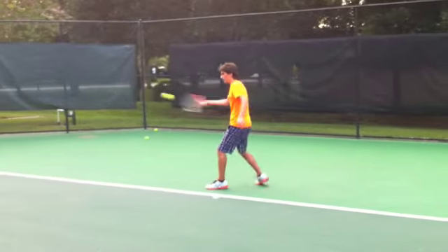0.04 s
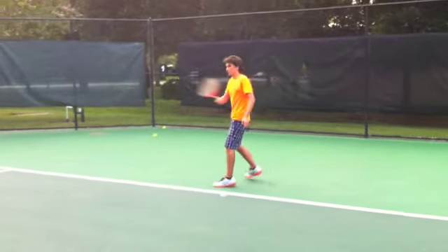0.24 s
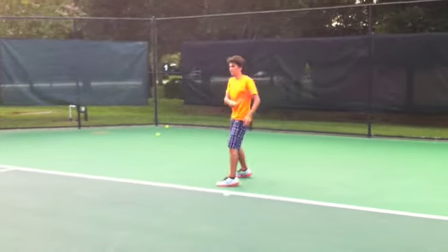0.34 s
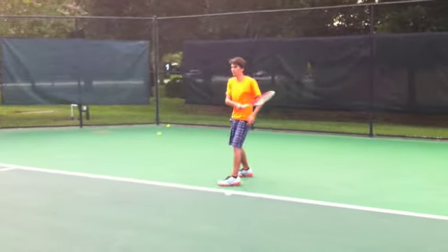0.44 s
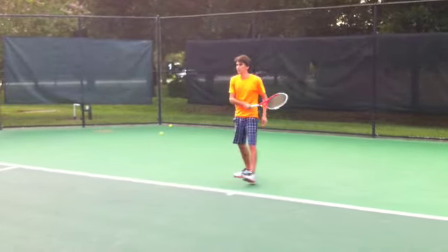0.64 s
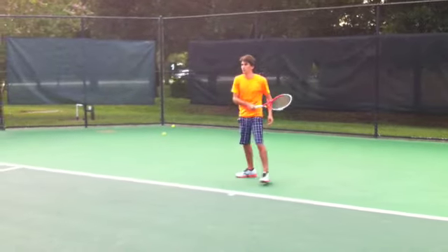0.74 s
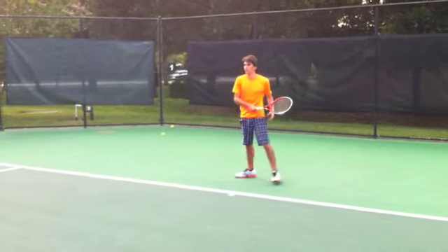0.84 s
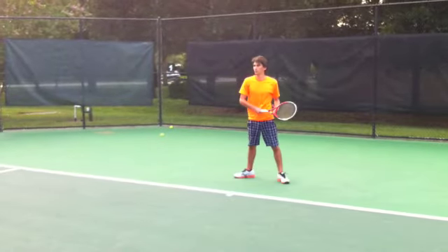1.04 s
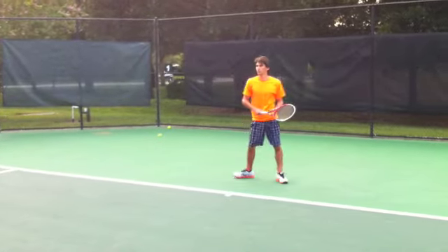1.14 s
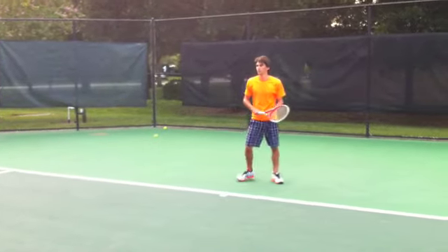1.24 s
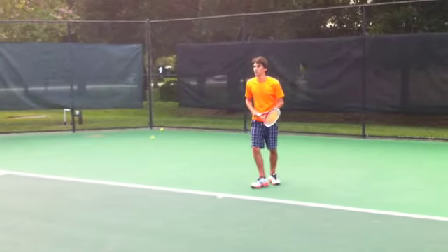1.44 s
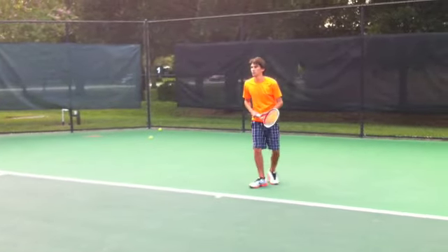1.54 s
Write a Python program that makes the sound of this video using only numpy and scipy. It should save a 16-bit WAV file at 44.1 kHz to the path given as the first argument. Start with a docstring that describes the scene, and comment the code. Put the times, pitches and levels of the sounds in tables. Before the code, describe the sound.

One crisp tennis stroke, strings ringing briefly, then light shoe scuffs over soft outdoor background noise

```python
"""One tennis stroke on an outdoor hard court: the strings crack against the ball, the ball pops, the strings ring on.
Shaped noise makes the crack and fading sine waves make the rest; the fence and trees send back smeared echoes.
Shoes scuff and tap with short bursts of noise, plus a low fading tone under each tap.
Behind lie coloured noise for distant traffic and leaves, a wavering engine hum, faint insects made of
narrow noise, and one thin falling whistle, probably a bird, made of a gliding sine."""
import sys
import numpy as np
from scipy import signal
from scipy.fft import rfft, irfft
from scipy.io import wavfile
from scipy.ndimage import uniform_filter1d

SR = 44100
rng = np.random.default_rng(int(sys.argv[2]) if len(sys.argv) > 2 else 0)


def generate_wav(signal):
    """Clip the signal to [-1, 1] and save it as 16-bit WAV at the path in sys.argv[1]."""
    frames = np.transpose(np.atleast_2d(signal))
    scaled = np.clip(frames, -1, 1) * 32767
    pcm = np.round(scaled).astype(np.int16)
    wavfile.write(sys.argv[1], SR, pcm)


N = 70560
T = np.arange(N) / SR  # time of each sample, s

# In the tables, fall60/s is the time to fade by 60 dB. A "colour" gives the balance of a noise over pitch.
# Colour of outdoor air, traffic and leaves: f/Hz, relative level/dB
AIR_COLOUR = [(25, -7), (45, -15), (80, -6.5), (125, -1), (180, 0.5), (255, -2), (320, -9.5), (430, -11.5),
              (620, -9.5), (1000, -9), (1400, -11.5), (1850, -12.5), (2200, -18.5), (3000, -22.5),
              (4300, -25), (5100, -22.5), (6200, -29.5), (9500, -29.5), (11000, -32.5), (16000, -33.5)]
# Loudness of the engine hum over time: t/s, level/dB
HUM_LEVEL = [(0, -64), (.6, -60.5), (.95, -62), (1.2, -58), (1.6, -60)]
# Path of the whistle: t/s, f/Hz, level/dB
WHISTLE_PATH = [(.7, 3750, -84), (.735, 3730, -66), (.77, 3715, -73), (.81, 3690, -66), (.87, 3620, -68),
                (.92, 3580, -72), (1.0, 3540, -84)]
# Shoe scuffs: start t/s, level/dB, rise/s, hold/s, fall60/s, tilt/(dB per octave), relative rasp level/dB
SCUFFS = [(.005, -58, 0.013, 0.013, 0.15, -1.5, -19), (0.445, -55, 0.013, 0.025, 0.25, 3, -3),
          (0.493, -60.5, .008, 0.012, 0.76, 2.5, 4), (0.566, -55.5, 0.012, 0.0059, 0.27, -4.5, -4),
          (1.555, -50, 0.02, 0.0098, 0.098, 3.5, 7)]
# Colour of a sole rubbing on the court, before the tilt: f/Hz, relative level/dB
SOLE_COLOUR = [(60, -42), (200, -1), (800, -0.5), (1600, 3), (2600, 1), (3900, 1), (5000, -1.5),
               (9000, -10.5), (16000, -18)]
# Shoe taps: start t/s, click level/dB, thud level/dB
TAPS = [(1.0839, -43, -41.5), (1.141, -51.5, -69)]
# Colour of the tap's click: f/Hz, relative level/dB
TAP_COLOUR = [(200, -4), (600, 0), (1000, 12.5), (1400, 2), (2100, -2), (3500, -13), (6500, -11),
              (9500, -11.5), (16000, -24)]
# Echoes off the fences and trees: delay/s, level/dB, smear fall60/s, tilt/(dB per octave)
ECHOES = [(0.03, -23.5, .035, 1), (0.041, -23.5, .05, 1), (.061, -28, 0.062, 1), (0.089, -32, 0.11, 1),
          (0.134, -32.5, .04, -5.5), (.185, -31, 0.02, -6.5)]
# Colour shared by the echoes, before the tilt: f/Hz, relative level/dB
ECHO_COLOUR = [(200, -1.5), (600, -12), (1000, -3.5), (1600, 0.5), (3000, 2.5), (6000, 4.5), (14000, 7)]
# How long the thin tail lasts at each pitch: f/Hz, fall60/s
TAIL_FADE = [(200, 2.1), (1000, 2.7), (3000, 0.79), (12000, 1.03)]
# Ringing tones of the string bed, lowest first: f/Hz, level/dB, fall60/s
STRING_MODES = [(613, -42.5, 0.28), (1568, -33.5, .12), (1715, -34.5, 0.056), (1905, -36, .07),
                (2150, -45.5, 0.16), (2260, -41.5, 0.086), (2635, -44, 0.091), (2810, -45, 0.081),
                (2900, -43.5, 0.065), (3900, -61, 0.06), (4200, -60, .05)]
# Colour of the crack and the rattle: f/Hz, relative level/dB
CRACK_COLOUR = [(150, -24), (500, -7), (1000, -9), (1600, 1.5), (2300, -6), (3300, -4), (5000, -12),
                (6800, -16.5), (8800, -12.5), (10300, -23.5), (16000, -23)]
# Push of the ball on the string bed: f/Hz, level/dB, rise/s, hold/s, fall60/s
THUMP_MODES = [(219.7, -30.5, 0.0047, 0.0043, 0.0084), (654, -25, 0.0035, 0.0016, 0.0053)]
# Hollow pop of the ball as it leaves: f/Hz, level/dB, rise/s, hold/s, fall60/s
POP_MODES = [(944, -31.5, 0.00033, 0.00047, 0.04), (999, -20, 0.00037, 0.0036, 0.02),
             (1203, -30, 0.00036, 0.009, 0.0067)]

HIT_S, DWELL_S = .2058, 0.00378  # first contact; time the ball stays in the strings
CRACK_DB, CRACK_RISE_S, CRACK_HOLD_S, CRACK_FALL60_S = -31.5, 0.00037, 0.0016, 0.017
RATTLE_DB, RATTLE_FALL60_S = -41.5, 0.065
FENCE_DELAY_S, FENCE_DB = .0425, -1  # level against the ringing string tone
TAIL_DB, TAIL_RISE_S = -25, 0.06
ECHO_PIVOT_HZ = 3000  # the echo tilt leaves this pitch alone
GRIT_DB = 0  # graininess of the noise; 0 leaves it even
CLUMP_DB, CLUMP_WIDTH_HZ = 0.3, 300
RASP_HZ, RASP_WIDTH_HZ, RASP_BASE_DB = 2630, 1800, -5.5
TAP_HOLD_S, TAP_FALL60_S = .003, 0.008
THUD_HZ, THUD_RISE_S, THUD_FALL60_S = 232, 0.0039, 0.029
AIR_DB, PATCH_DB, SWELL_DB = -55, 1, 0  # a swell of 0 keeps the overall level steady
HUM_HZ, HUM_WANDER_HZ, HUM_THROB_DEPTH, HUM_THROB_HZ = 184.9, 7.22, 0.46, 11.6
INSECT_HZ, INSECT_WIDTH_HZ, INSECT_DB = 7290, 360, -77
INSECT_THROB_HZ, INSECT_PEAK_S, INSECT_DEPTH = 4.4, .17, .5
FLUTTER_DEPTH = .45
LOW_CUT_HZ, TOP_CUT_HZ = 92, 15880


def amp(db):
    """Turns decibels into a multiplying factor."""
    return 10 ** (np.asarray(db) / 20)


def unit(x):
    """Scales a signal to an average strength (rms) of 1."""
    return x / np.sqrt(np.mean(x ** 2) + 1e-20)


def read(points, hz):
    """Reads a table between its points, with pitch on a logarithmic scale as the ear hears it."""
    f, value = np.transpose(points)
    return np.interp(np.log(hz + 1), np.log(f + 1), value)


def noise(colour, tilt_db=0):
    """Hiss with a given colour, tilted by some dB per octave."""
    hz = np.fft.rfftfreq(N, 1 / SR)
    gain = amp(read(colour, hz) + tilt_db * np.log2(hz + 1))
    grains = rng.standard_normal(N) * amp(GRIT_DB * rng.standard_normal(N))
    return unit(irfft(rfft(grains) * gain, N))


def band(centre_hz, width_hz):
    """Narrow noise: a wavering tone, or a random wobble when centred on zero."""
    hz = np.fft.rfftfreq(N, 1 / SR)
    gain = 1 / (1 + (2 * (hz - centre_hz) / width_hz) ** 2)
    return unit(irfft(rfft(rng.standard_normal(N)) * gain, N))


def envelope(start, rise, hold, fall60):
    """Loudness shape: a straight rise, a hold, then a smooth fade by 60 dB every fall60 seconds."""
    t = T - start
    fade_time = np.maximum(t - rise - hold, 0)
    return np.clip(t / rise, 0, 1) * np.exp(-np.log(1000) * fade_time / fall60)


def mode(start, hz, db, rise, hold, fall60):
    """One struck resonance: a sine wave that swells and fades."""
    return amp(db) * envelope(start, rise, hold, fall60) * np.sin(2 * np.pi * hz * (T - start))


def sing(level, hz):
    """A sine of changing pitch and rms level: adding up the pitch over time gives its phase."""
    return level * np.sqrt(2) * np.sin(2 * np.pi * np.cumsum(hz) / SR)


def background():
    """Distant traffic and leaves: noise whose level drifts in patches of time and pitch."""
    z = signal.stft(noise(AIR_COLOUR), nperseg=512)[2]
    # smooth random values along time, then along pitch
    patches = uniform_filter1d(rng.standard_normal(z.shape), size=12, axis=1)
    patches = unit(uniform_filter1d(patches, size=6, axis=0))
    air = signal.istft(z * amp(PATCH_DB * patches), nperseg=512)[1][:N]
    return air * amp(AIR_DB + SWELL_DB * band(0, width_hz=9.2))


def hum():
    """A far engine drones: one tone, throbbing unevenly and wandering a little in pitch."""
    hz = HUM_HZ + HUM_WANDER_HZ * band(0, width_hz=14.8)
    throb = 1 + HUM_THROB_DEPTH * band(HUM_THROB_HZ, width_hz=7.4)
    level = amp(np.interp(T, *np.transpose(HUM_LEVEL))) * throb
    return sing(level, hz)


def insects():
    """A faint shrill from the trees: narrow high noise with a regular throb."""
    throb = 1 + INSECT_DEPTH * np.cos(2 * np.pi * INSECT_THROB_HZ * (T - INSECT_PEAK_S))
    return amp(INSECT_DB) * throb * band(INSECT_HZ, INSECT_WIDTH_HZ)


def bird():
    """One far whistle: a sine that sags in pitch while its loudness flutters unevenly."""
    s, hz, db = np.transpose(WHISTLE_PATH)
    flutter = 1 + FLUTTER_DEPTH * band(35, width_hz=60)
    level = np.interp(T, s, amp(db), left=0, right=0) * flutter
    return sing(level, np.interp(T, s, hz))


def shoes():
    """Soles rub over the court as rasping noise, and tap down with a click and a low thud."""
    out = np.zeros(N)
    for start, db, rise, hold, fall60, tilt_db, rasp_db in SCUFFS:
        rub = noise(SOLE_COLOUR, tilt_db)
        rasp = amp(RASP_BASE_DB + rasp_db) * band(RASP_HZ, RASP_WIDTH_HZ)
        clumps = amp(CLUMP_DB * band(0, CLUMP_WIDTH_HZ))  # slight unevenness in level
        out += amp(db) * envelope(start, rise, hold, fall60) * unit((rub + rasp) * clumps)
    for start, click_db, thud_db in TAPS:
        click_shape = envelope(start, 1 / SR, TAP_HOLD_S, TAP_FALL60_S)
        out += amp(click_db) * click_shape * noise(TAP_COLOUR)
        out += mode(start, THUD_HZ, thud_db, THUD_RISE_S, 0, THUD_FALL60_S)
    return out


def court(x):
    """Fence and trees scatter the hit into smeared echoes, the late ones duller, and a thin tail."""
    hz = np.fft.rfftfreq(N, 1 / SR)
    octaves = np.log2(np.maximum(hz / ECHO_PIVOT_HZ, .25))  # the tilt stops two octaves below the pivot
    response = np.zeros(N)
    for delay, db, fall60, tilt_db in ECHOES:
        colour = amp(read(ECHO_COLOUR, hz) + tilt_db * octaves)
        scatter = irfft(rfft(rng.standard_normal(N)) * colour, N)
        response += amp(db) * scatter * unit(envelope(delay, 1 / SR, 0, fall60)) / np.sqrt(N)
    # the tail is noise that fades at its own speed at each pitch
    hz, t, z = signal.stft(rng.standard_normal(N), SR, nperseg=256)
    fade = np.exp(-np.log(1000) * t / read(TAIL_FADE, hz)[:, None])
    tail = signal.istft(z * fade, SR, nperseg=256)[1][:N]
    tail = tail * np.minimum(T / TAIL_RISE_S, 1)
    response += amp(TAIL_DB) * tail / np.linalg.norm(tail)
    return signal.fftconvolve(x, response)[:N]


def strings():
    """The string bed rings on as fading tones; the lowest also returns from the fence's windscreen."""
    ring = sum(mode(HIT_S, hz, db, CRACK_RISE_S, 0, fall60) for hz, db, fall60 in STRING_MODES)
    hz, db, fall60 = STRING_MODES[0]
    echo = amp(db + FENCE_DB) * envelope(HIT_S + FENCE_DELAY_S, CRACK_RISE_S, 0, fall60)
    return ring + echo * np.sin(2 * np.pi * hz * (T - HIT_S))  # the echo stays in step with the ring


def impact():
    """Crack, rattle of many high string tones and thump at contact, then the ball's pop as it leaves."""
    crack = amp(CRACK_DB) * envelope(HIT_S, CRACK_RISE_S, CRACK_HOLD_S, CRACK_FALL60_S)
    rattle = amp(RATTLE_DB) * envelope(HIT_S, CRACK_RISE_S, 0, RATTLE_FALL60_S)
    thump = sum(mode(HIT_S, *row) for row in THUMP_MODES)
    pop = -sum(mode(HIT_S + DWELL_S, *row) for row in POP_MODES)  # starts in the opposite direction
    return (crack + rattle) * noise(CRACK_COLOUR) + thump + pop


def scene():
    """Adds all the sounds together; only the impact goes through the court's echoes and tail."""
    hit = impact()
    stroke = hit + strings() + court(hit)
    return (stroke + shoes() + background() + hum() + insects() + bird())[None]


def record(dry):
    """The microphone's low cut thins the bass; the recorder's band limit removes the very top."""
    low_cut = signal.butter(2, LOW_CUT_HZ, "highpass", fs=SR, output="sos")
    thin = signal.sosfilt(low_cut, dry)
    top_cut = signal.firwin(511, TOP_CUT_HZ, window=("kaiser", 9), fs=SR)
    return signal.oaconvolve(thin, top_cut[None], "same")


dry = scene()
out = record(dry)
generate_wav(out)
```